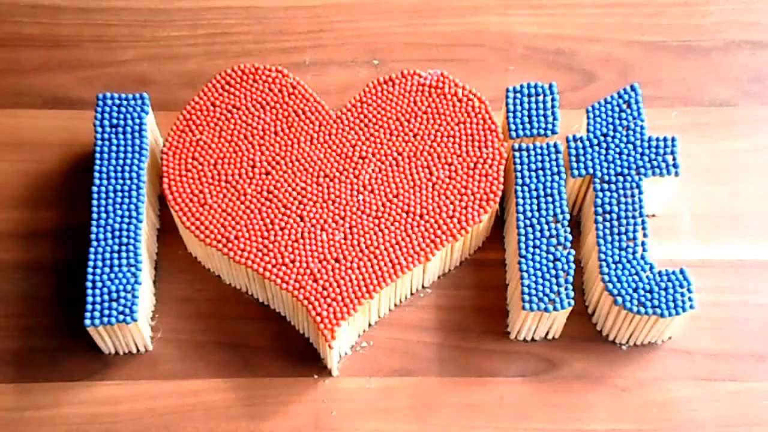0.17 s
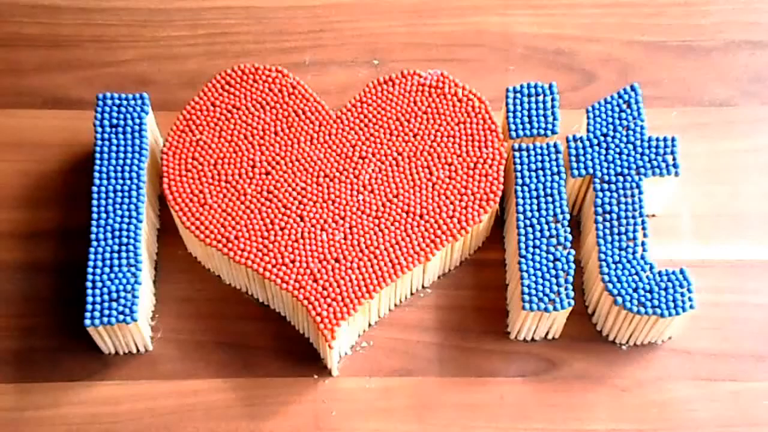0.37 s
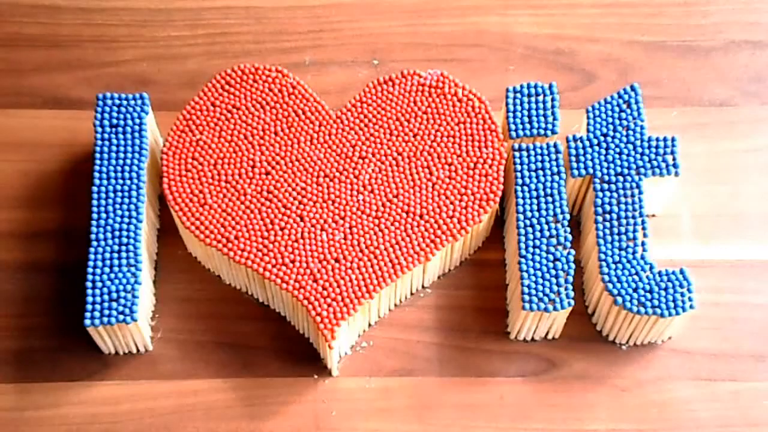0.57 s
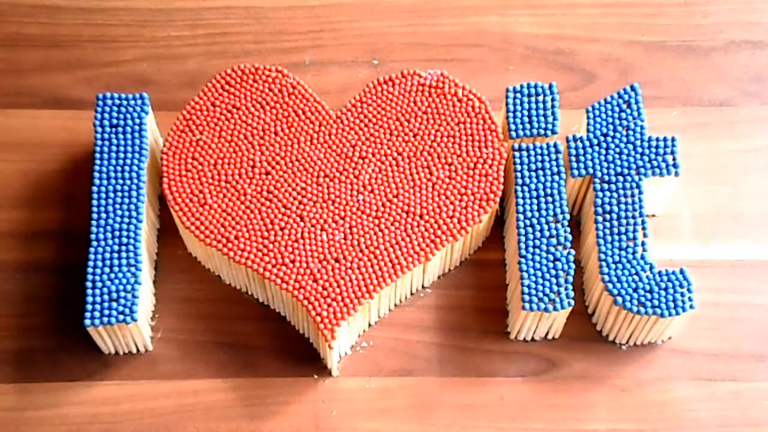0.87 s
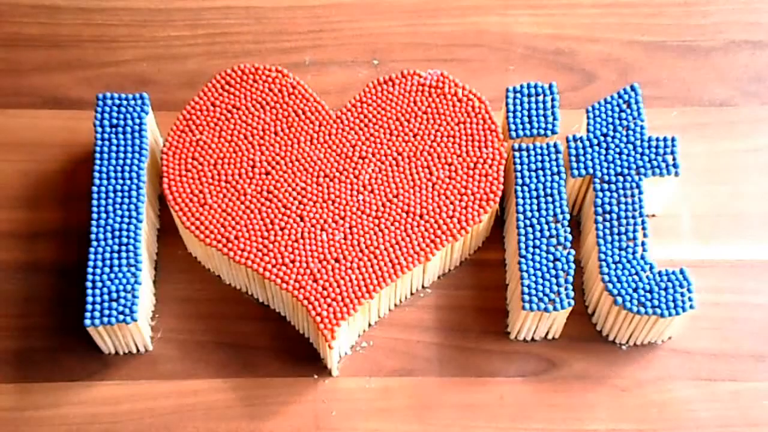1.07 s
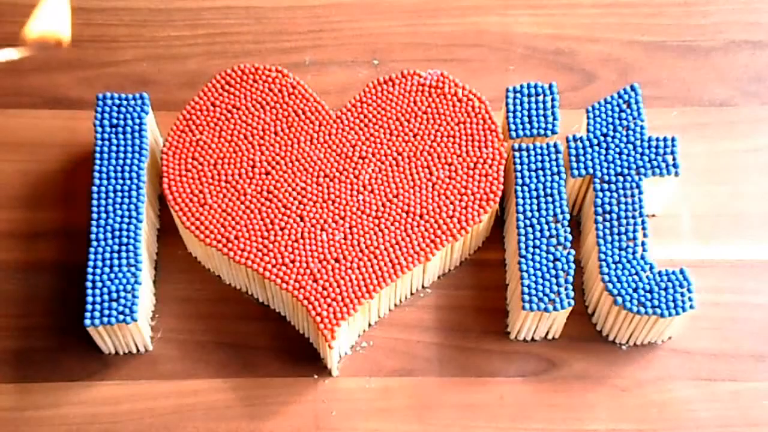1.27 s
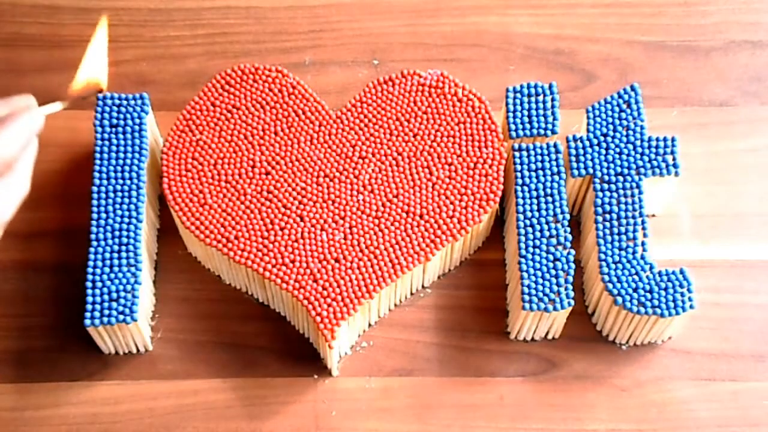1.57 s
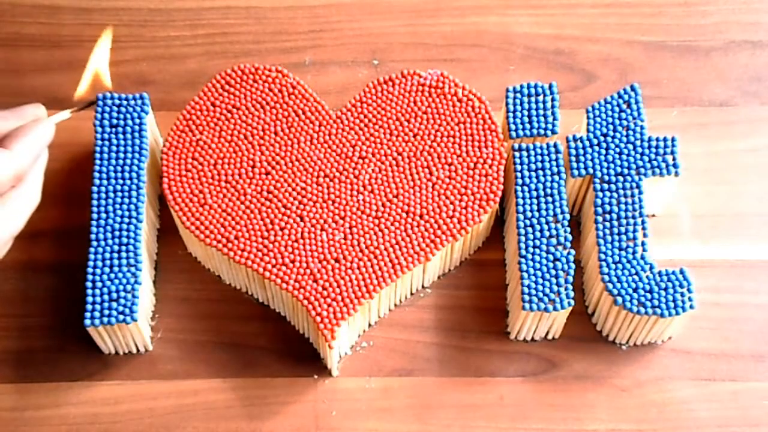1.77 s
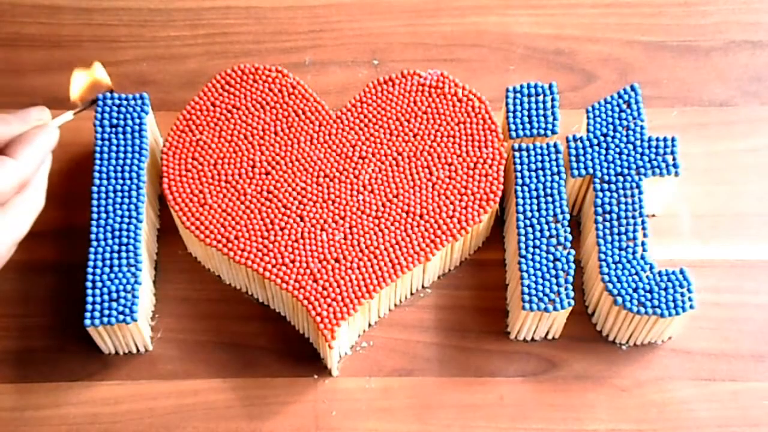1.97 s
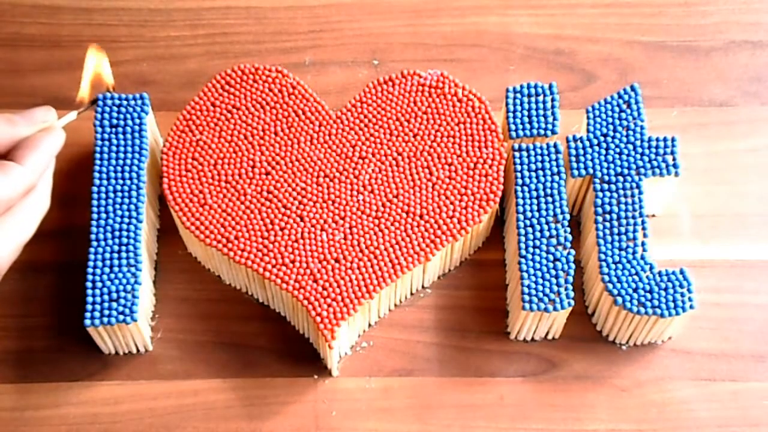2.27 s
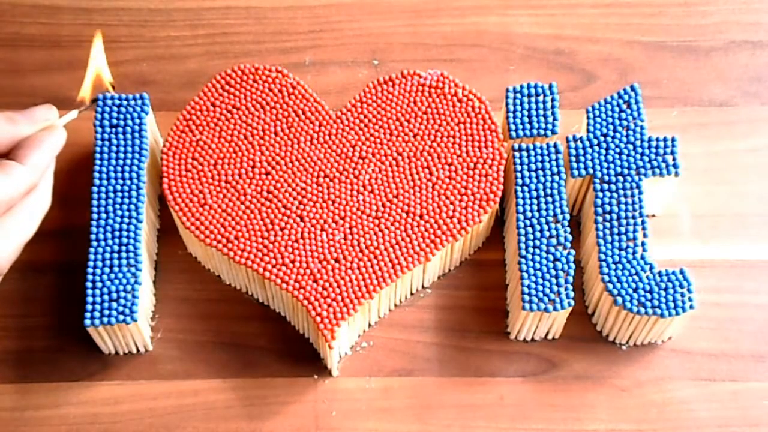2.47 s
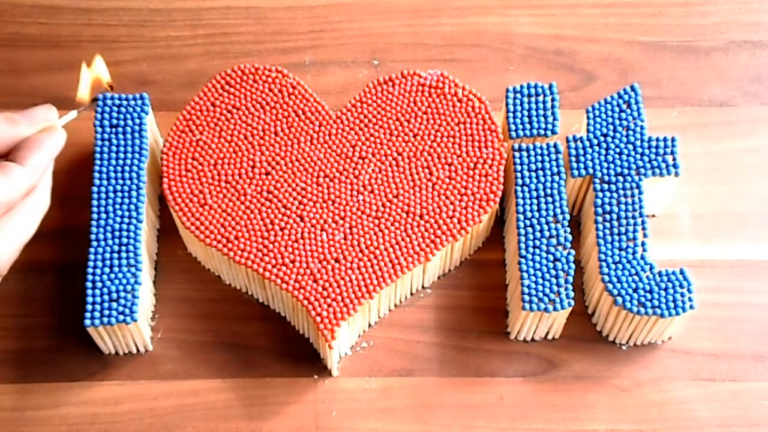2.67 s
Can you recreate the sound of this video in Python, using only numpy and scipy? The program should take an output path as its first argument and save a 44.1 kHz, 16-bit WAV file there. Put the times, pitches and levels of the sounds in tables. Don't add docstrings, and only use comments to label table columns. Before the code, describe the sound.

A match is struck on its box close to a small camera microphone in a quiet room: squeaky scrape, tiny snap, hand swish, soft hissing flare, then low hum, pulsing noise and sparse tick chatters.

```python
import sys
import numpy as np
from scipy import signal
from scipy.fft import rfft, irfft, next_fast_len
from scipy.io import wavfile
from scipy.ndimage import uniform_filter1d, map_coordinates

SR = 44100
rng = np.random.default_rng(int(sys.argv[2]) if len(sys.argv) > 2 else 0)


def to_wav(sig):
    pcm = np.clip(np.atleast_2d(sig), -1, 1) * 32767
    pcm = np.round(pcm).astype(np.int16)
    wavfile.write(sys.argv[1], SR, pcm.T)


def invert_db(level):
    return 10 ** (np.asarray(level, dtype=float) / 20)


N = 123921
FRAME_HZ = 30.0


def unit(x):
    return x / np.sqrt(np.mean(x ** 2) + 1e-20)


def evened(x, seconds):
    return unit(x / np.sqrt(abs(uniform_filter1d(x ** 2, round(seconds * SR))) + 1e-9))


def along(points, hz, closed=True):
    f, v = np.transpose(points)
    if closed:
        f = np.r_[f[0] / 2, f, f[-1] * 2]
        v = np.r_[-120, v, -120]
    return invert_db(np.interp(np.log(hz + 1), np.log(f + 1), v))


def curves(rows):
    s, level, *cols = np.transpose(rows)
    t = np.arange(N) / SR
    gain = invert_db(np.interp(t, s, level, -140, -140))
    return [gain] + [np.interp(t, s, c) for c in cols]


def wobble(rate):
    knots = rng.standard_normal(int(N * rate / SR) + 4)
    return map_coordinates(knots, [np.arange(N) * rate / SR])


def filtered(x, response):
    m = next_fast_len(N + 8192)
    return irfft(rfft(x, m) * response(np.fft.rfftfreq(m, 1 / SR)), m)[..., :N]


def noise(spectrum):
    return unit(filtered(rng.standard_normal(N), lambda hz: along(spectrum, hz)))


def rings(x, peaks):
    def response(f):
        total = 0
        for k, (centre, width, db) in enumerate(peaks):
            resonance = 1j * f * width / (centre * centre - f * f + 1j * f * width)
            total = total + (-1) ** k * invert_db(db) * resonance
        return total ** 2
    return filtered(x, response)


def clicks(rate_hz, scatter_s, spread_db):
    chance = rng.standard_normal((int(N / SR * 2000), 3))[:int(N / SR * rate_hz)]
    at = np.arange(len(chance)) / rate_hz + scatter_s * chance[:, 0]
    size = np.sign(chance[:, 2]) * invert_db(spread_db * chance[:, 1])
    return np.bincount(np.clip(at * SR, 0, N - 1).astype(int), size, N)


def gliding(source, centre_hz, width):
    hz, t, z = signal.stft(source, SR, nperseg=256, noverlap=224)
    centre = centre_hz[np.clip(t * SR, 0, N - 1).astype(int)]
    shaped = z / (1 + ((hz[:, None] / centre - 1) / width) ** 2)
    return unit(signal.istft(shaped, SR, nperseg=256, noverlap=224)[1][:N])


def scrape():
    # t/s, level/dB, rasp f/Hz
    stroke = [
        (.11, -73, 1100),
        (.145, -70, 1270),
        (.158, -70, 1800),
        (.172, -70, 2100),
        (.182, -68, 2730),
        (.198, -68, 2900),
        (.215, -73, 3300),
        (.25, -75, 2640),
        (.28, -82, 2600),
    ]
    # f/Hz, level/dB per Hz
    grit_colour = [(500, -10), (1500, -5.5), (3500, -11), (6000, -15.5), (10000, -21)]
    grit_db, grit_growth = 3.5, 0.59
    level, pitch_hz = curves(stroke)
    grains = unit(clicks(1900, .0008, 2.3))
    grit = unit(filtered(grains, lambda hz: along(grit_colour, hz)))
    rasp = gliding(grains, pitch_hz, 0.088) * invert_db(1.1 * wobble(117))
    grit_level = invert_db(grit_db) * level.max() * (level / level.max()) ** grit_growth
    return level * rasp + grit_level * grit


def squeaks():
    slips = [
        (.156, .022, 1960, -68),
        (.176, .008, 2200, -64),
        (.172, .018, 2800, -66),
        (.184, .02, 2730, -61),
        (.185, .009, 3200, -68),
        (.222, .03, 2620, -74),
    ]
    t = np.arange(N) / SR
    out = np.zeros(N)
    for s, length, hz, db in slips:
        swell = np.sin(np.pi * np.clip((t - s) / length, 0, 1))
        flutter = invert_db(db + 2.4 * wobble(215))
        cycles = hz * np.cumsum(1 + .022 * wobble(243.5)) / SR
        out += 2 * flutter * swell * np.sin(2 * np.pi * cycles)
    return out


def smoulder():
    # t/s, level/dB
    fizz = [(.11, -72), (.25, -73), (.36, -70), (.45, -71.5), (.58, -75), (.7, -80)]
    # f/Hz, level/dB per Hz
    fizz_colour = [(1200, -5), (2500, -0.5), (4500, -3.5), (7000, -7.5), (10500, 0)]
    return curves(fizz)[0] * invert_db(.8 * wobble(40)) * noise(fizz_colour)


def snap():
    # f/Hz, width/Hz, level/dB
    crack_ring = [(9300, 4500, 0)]
    return rings(invert_db(-40) * (np.arange(N) == round(.319 * SR)), crack_ring)


def swish():
    # t/s, level/dB
    motion = [(.3, -66), (.42, -62), (.47, -56.5), (.49, -57), (.56, -57.5), (.65, -71)]
    # f/Hz, level/dB per Hz
    air_colour = [(80, 6.5), (160, 6.5), (300, -7), (500, -4.5), (1000, -17.5), (2500, -23)]
    return curves(motion)[0] * noise(air_colour)


def spark():
    # t/s, level/dB
    puff = [
        (.47, -77),
        (.485, -63.5),
        (.505, -64),
        (.535, -75),
    ]
    # f/Hz, level/dB per Hz
    puff_colour = [(800, -9), (3000, -9), (6000, -3), (8500, 0), (9900, 6), (11000, 0)]
    return curves(puff)[0] * noise(puff_colour)


def flare():
    # t/s, level/dB, treble/dB, opening of the flame 0-1
    burning = [
        (.705, -76, -5, .05),
        (.732, -64, -4, .1),
        (.758, -61, 0.5, .15),
        (.81, -57.5, 0, 0),
        (.85, -57, -0.5, 0.6),
        (.93, -57.5, 1, 0.84),
        (1.0, -57, -3, 0.87),
        (1.05, -58.5, -4, 0),
        (1.17, -78.5, -10, 0.3),
    ]
    # f/Hz, level/dB per Hz
    jet_colour = [(700, -10), (1150, -12.5), (1600, -6), (2300, -3), (3500, -1), (5500, -3), (8000, -3.5),
                  (11000, -2)]
    # f/Hz, width/Hz, level/dB
    shut_peaks = [(1195, 1170, -3)]
    open_peaks = [(2120, 300, 0.5), (3280, 870, -3)]
    throat_db, treble_hz = -6.5, 4530
    level, treble_db, opening = curves(burning)
    opening = np.clip(opening, 0, 1)
    jet = noise(jet_colour) * invert_db(.9 * wobble(300) + .4 * wobble(30))
    dull = filtered(jet, lambda hz: 1 / (1 + (hz / treble_hz) ** 4))
    bright = (jet - dull) * invert_db(treble_db)
    shut = evened(rings(rng.standard_normal(N), shut_peaks), .03)
    wide = evened(rings(rng.standard_normal(N), open_peaks), .03)
    throat = np.sqrt(1 - opening) * shut + np.sqrt(opening) * wide
    throat = throat * invert_db(0.91 * wobble(60.3))
    return level * (dull + bright + invert_db(throat_db) * throat)


def chatter():
    # t/s, low ring f/Hz, low ring level/dB, high ring level/dB
    stores = [(.372, 4450, -61, -66), (.377, 4400, -70, -64), (.408, 4320, -66, -68),
              (.414, 4250, -68, -65), (.419, 4400, -63, -66), (.430, 4700, -61, -68),
              (.440, 4300, -64, -69), (.446, 4400, -72, -69), (.553, 4500, -60, -62),
              (.558, 4450, -68, -62), (1.409, 4400, -62, -71), (1.416, 4400, -71, -68),
              (1.602, 4680, -64, -59), (1.609, 4250, -60, -66), (1.614, 4430, -62, -64),
              (1.934, 4050, -63, -66), (1.942, 4350, -60, -70), (1.949, 4350, -62, -62),
              (1.955, 4130, -65, -65), (1.96, 4450, -65, -60), (1.971, 4850, -63, -66),
              (1.981, 4350, -60, -64), (2.436, 4450, -69, -68), (2.443, 4400, -61, -68),
              (2.647, 4550, -66, -59), (2.651, 4550, -66, -66), (2.655, 4200, -60, -65),
              (2.658, 4400, -62, -64), (2.662, 4300, -61, -65), (2.666, 4400, -67, -68),
              (2.679, 4400, -74, -63)]
    rise_s, t60_s = 0.00055, 0.011
    out, t = np.zeros(N + SR), np.arange(SR // 40) / SR
    shape = invert_db(5) * invert_db(-60 * t / t60_s) * (1 - np.exp(-t / rise_s))
    chances = rng.standard_normal((len(stores), 3))
    for (s, low_hz, low_db, high_db), (stray, low_turn, high_turn) in zip(stores, chances):
        high_hz = 6000 * (1 + .025 * stray)
        low = invert_db(low_db) * np.sin(2 * np.pi * (low_hz * t + low_turn))
        high = invert_db(high_db) * np.sin(2 * np.pi * (high_hz * t + high_turn))
        out[round(s * SR):][:len(t)] += shape * (low + high)
    return out[:N]


def frame_busy():
    start, share, edge = -.04, .62, .12
    place = (np.arange(N) / SR * FRAME_HZ - start) % 1
    return np.clip(np.minimum(place, share - place) / edge + .5, 0, 1)


def hum():
    # t/s, change of hum/dB
    load = [(.1, 4), (.3, 1), (.55, 0.5), (.7, -2.5), (.95, 1.5), (1.15, -4), (1.35, 5.5), (1.7, 2),
            (2.0, -0.5), (2.25, 1.5), (2.35, -5), (2.47, -1.5), (2.65, -5.5), (2.81, 1)]
    low_at = 0.23
    turn = 2 * np.pi * (np.arange(N) / SR * FRAME_HZ - low_at)
    wave = np.cos(turn) + invert_db(-15.5) * np.cos(2 * turn)
    return -np.sqrt(2) * invert_db(-54 + 1.2 * wobble(8.97)) * curves(load)[0] * wave


def readout(busy, loads):
    # f/Hz, level/dB per Hz
    burst_colour = [(50, 0.5), (150, 1.5), (300, -7), (500, -14), (1100, -20.5), (2000, -28.5), (4000, -38),
                    (9000, -48)]
    smoothed_hz, idle, release_s = 420, 0.19, 0.0034
    source = .8 * abs(loads) + rng.standard_normal(N)
    steps = unit(filtered(source, lambda hz: 1j * along(burst_colour, hz)))
    slow = filtered(steps, lambda hz: 1 / (1 + (hz / smoothed_hz) ** 4))
    fast = steps - slow
    slow = evened(slow, 1 / FRAME_HZ) * slow.std()
    fast = evened(fast, 1 / FRAME_HZ) * fast.std()
    lingering = idle + filtered(busy, lambda hz: 1 / (1 + 2j * np.pi * hz * release_s))
    level = invert_db(-56.5 + 0.34 * wobble(24.58) + 0.23 * wobble(2.8))
    return level * (lingering * slow + (1 + idle) * busy * fast)


def ticks(busy, loads):
    # f/Hz, width/Hz, level/dB
    circuit = [(6170, 1060, -0.5), (8140, 510, -2.5), (10650, 910, 2)]
    return invert_db(-73.5) * unit(rings((loads + 0.71 * rng.standard_normal(N)) * busy, circuit))


def whine():
    # f/Hz, level/dB rms
    tones = [(10045, -80), (8005, -98)]
    t = np.arange(N) / SR
    out = np.zeros(N)
    for hz, db in tones:
        level = np.sqrt(2) * invert_db(db + 1.5 * wobble(20))
        out += level * np.sin(2 * np.pi * hz * t + .4 * wobble(8))
    return out


def floor_noise():
    # f/Hz, level/dB per Hz, both tables
    rumble_colour = [(20, 4), (32, -9), (52, 6), (65, -9.5), (85, -5.5), (150, -22.5), (400, -39)]
    hiss_colour = [(150, 14.5), (330, 8), (600, 7), (1100, 4.5), (1600, 1.5), (4000, -1.5), (8000, -4),
                   (10800, -2)]
    rumble = invert_db(-53.5) * evened(noise(rumble_colour), 0.17)
    return rumble + invert_db(-68 + 0.59 * wobble(5.67)) * noise(hiss_colour)


def camera():
    busy = frame_busy()
    loads = unit(np.clip(clicks(264.46, .0011, 3), -1.3, 1.3))
    return hum() + readout(busy, loads) + ticks(busy, loads) + whine() + floor_noise()


def scene():
    match = scrape() + squeaks() + smoulder() + snap() + swish() + spark() + flare()
    mono = match + chatter() + camera()
    return np.array([mono, mono])


def roll_off(x):
    return signal.sosfilt(signal.butter(12, 11480, fs=SR, output="sos"), x)


def record(dry):
    # f/Hz, level/dB
    band_edge = [(10300, -0.5), (10800, -9), (11300, -16.5), (11480, -7), (11560, -60)]
    # t/s, low f/Hz, high f/Hz, level/dB
    side_bursts = [
        (.862, 4250, 5140, -69),
        (.978, 5600, 7500, -68),
        (.978, 8860, 10400, -73),
    ]
    t = np.arange(N) / SR
    side = np.zeros(N)
    for s, low_hz, high_hz, db in side_bursts:
        swell = np.clip(1.5 - abs(t - s) / 0.019, 0, 1) ** 3
        band = filtered(rng.standard_normal(N), lambda hz: (hz > low_hz) & (hz < high_hz))
        side += invert_db(db) * swell * unit(band)
    wet = filtered(dry, lambda hz: along(band_edge, hz, closed=False)) + side * [[1], [-1]]
    return roll_off(wet * (t >= .10877))


dry = scene()
out = record(dry)
to_wav(out)
```